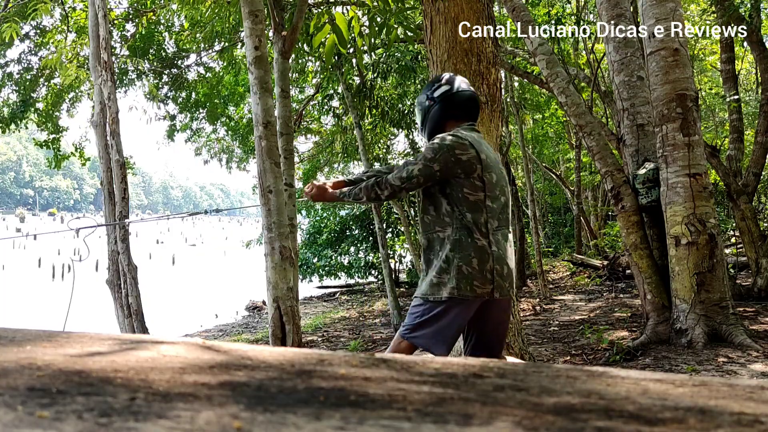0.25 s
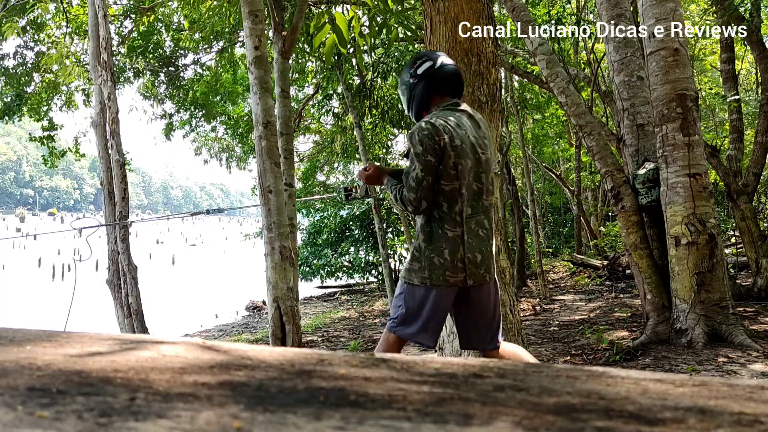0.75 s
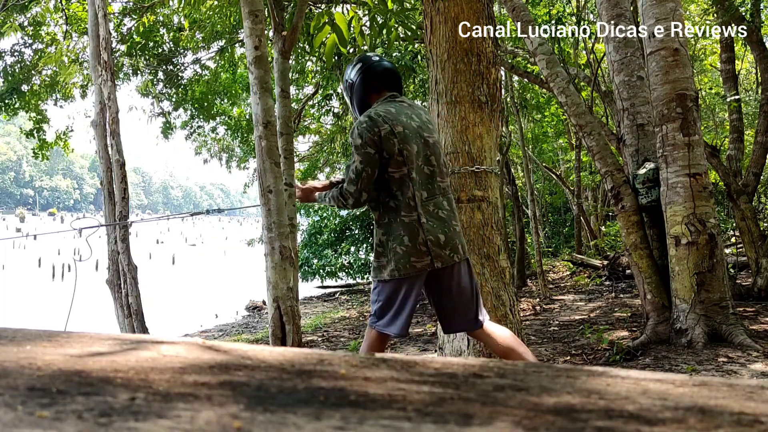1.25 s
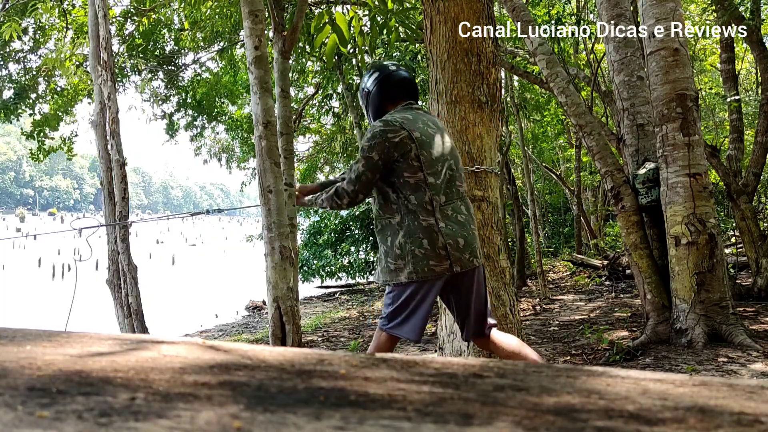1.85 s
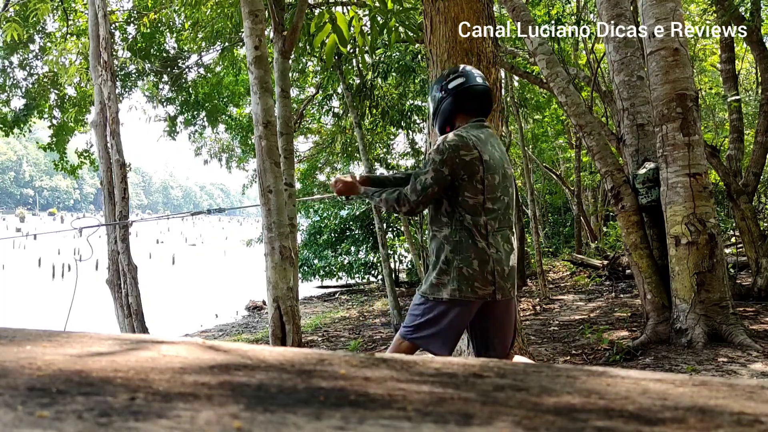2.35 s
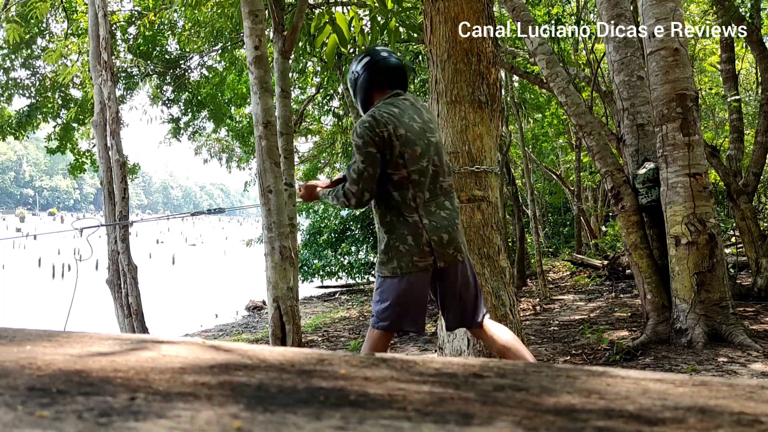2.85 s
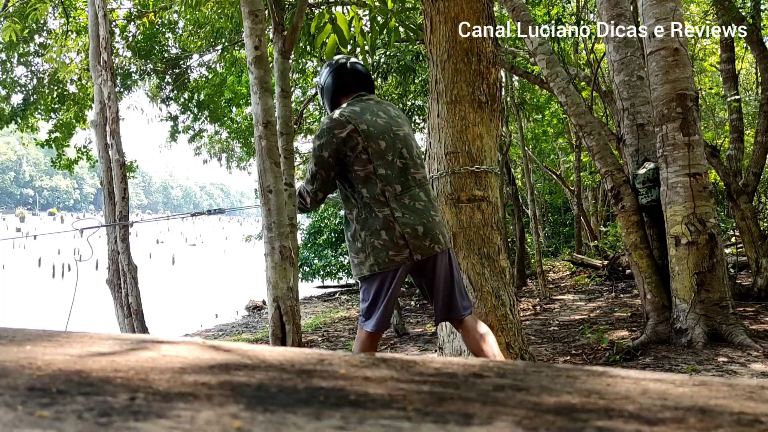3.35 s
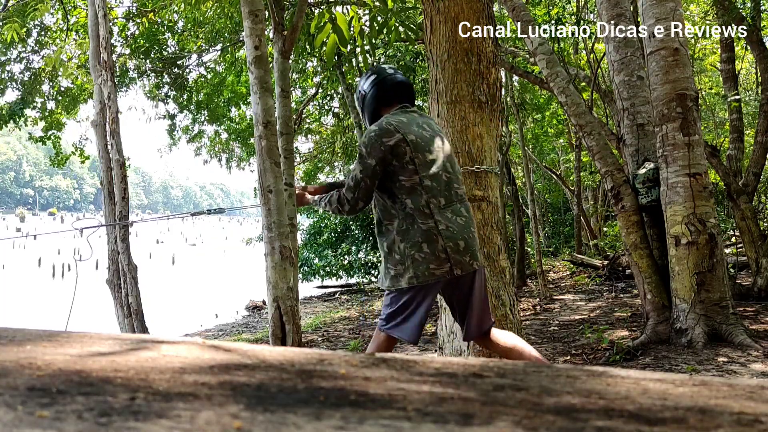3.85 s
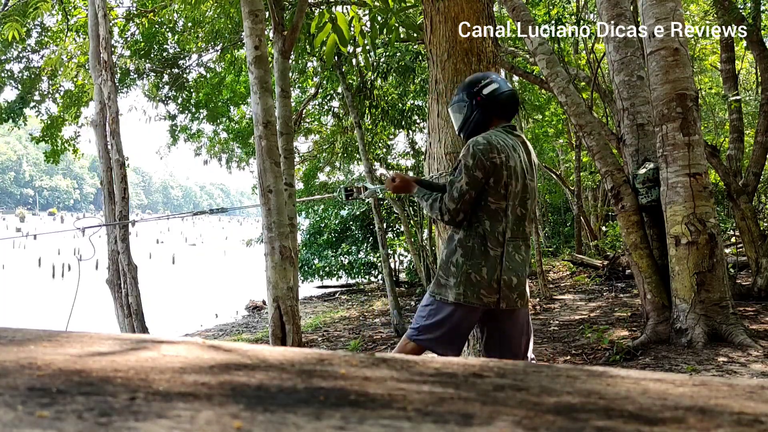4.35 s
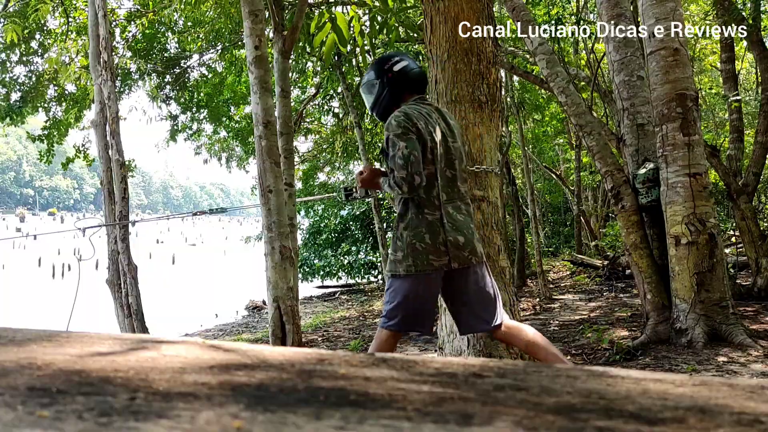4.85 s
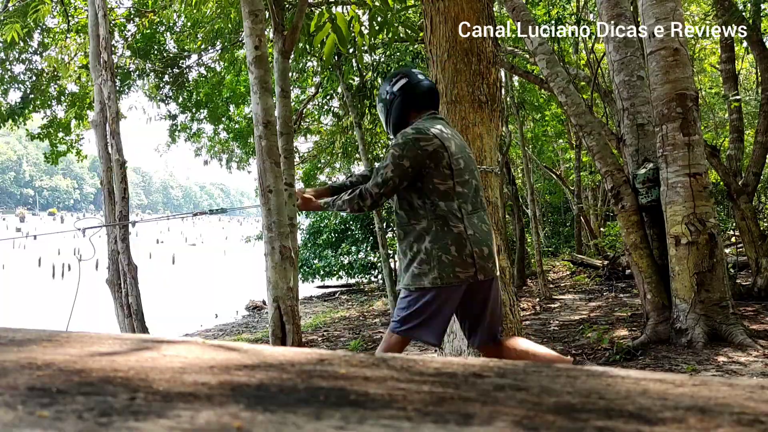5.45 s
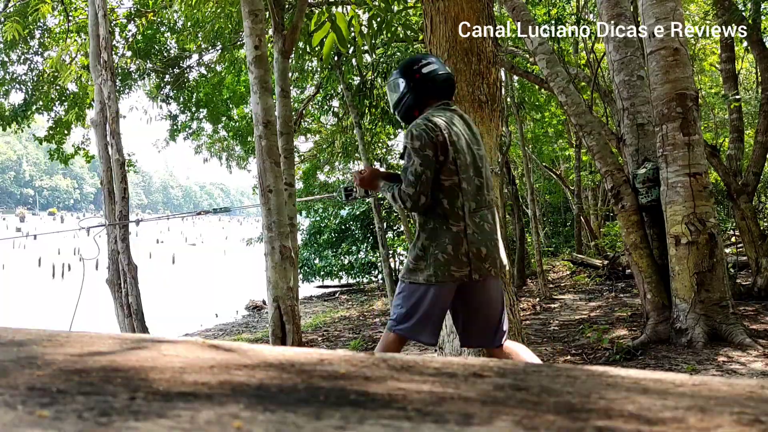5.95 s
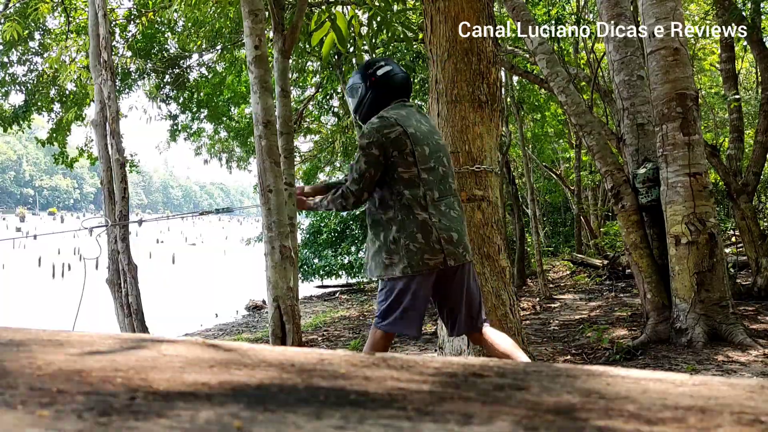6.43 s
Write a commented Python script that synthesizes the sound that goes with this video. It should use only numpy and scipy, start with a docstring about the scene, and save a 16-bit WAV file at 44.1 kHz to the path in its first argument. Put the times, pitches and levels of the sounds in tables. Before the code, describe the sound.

Outdoors among trees, a hand lever winch is pumped under heavy load, heard fairly close in stereo over quiet leaf hiss and low wind rumble. After a small click at 0.3 s, sharp steel snaps fall at 0.53, 0.66 and 0.87, then 1.23 and 1.49, each a dry crack with short metallic ring and brief bright echo. Weaker ticks follow until a double snap at 2.5, then 2.83 and 3.04. It is mostly quiet until about 4.2, with faint ticks and knocks. The loudest cracks come at 4.35 and 4.46, with others at 4.85 and 5.28, where sound cuts out for an instant and fades back. Smaller rattles crowd 5.3 to 6.1, with a dull thud at 5.57. A strong snap and heavier thud hit at 6.25, more clicks follow to 6.67. Faint creaks run beneath; wind bumps swell near 5.46, 5.8 and the end.

```python
"""Steel snaps are heard first: a hand lever winch is pumped under load among trees.
Each pawl snap is a swarm of tiny contacts that rings pawl and lever; wheel modes and echoes linger after it.
Below, shaken frame modes thud, and uneven jerks of cable and frame sound groaning resonances.
Behind lie the hiss of leaves and the rumble of wind on the microphone ports, both shaped from noise.
Once the sound drops out for an instant and fades back."""
import sys
import numpy as np
from scipy import signal
from scipy.fft import rfft, irfft
from scipy.io import wavfile

SR = 44100
rng = np.random.default_rng(int(sys.argv[2]) if len(sys.argv) > 2 else 0)


def dump(signal):
    """Clip the signal to [-1, 1] and save it as 16-bit WAV at the path in sys.argv[1]."""
    limited = np.clip(np.atleast_2d(signal).T, -1, 1)
    pcm = np.round(limited * 32767).astype(np.int16)
    wavfile.write(sys.argv[1], SR, pcm)


N = 295029   # length [samples]


def from_db(db):
    """Decibels to gain."""
    return 10 ** (np.asarray(db) / 20)


def rms_one(x):
    """Scales to rms 1."""
    return x / np.sqrt(np.mean(x ** 2) + 1e-20)


def at_hz(points, hz):
    """Reads a table along a log-frequency axis."""
    table = np.array(points)
    return np.interp(np.log(hz), np.log(table[:, 0]), table[:, 1])


def bins():
    """Frequencies of the transform [Hz], kept above zero for the logarithm."""
    return np.maximum(np.fft.rfftfreq(N, 1 / SR), 1)


def colour(x, spectrum):
    """Shapes by a spectrum, keeping the level of white noise."""
    return irfft(rfft(x) * rms_one(from_db(at_hz(spectrum, bins()))), N)


def drift(rate_hz):
    """Random wander of rms 1: noise through two equal low-pass poles, made at every 40th sample."""
    pole = np.exp(-2 * np.pi * rate_hz * 40 / SR)
    noise = rng.standard_normal(N // 40 + 2002)
    slow = signal.lfilter([1], [1, -2 * pole, pole * pole], noise)[2000:]   # skip the run-in
    return np.interp(np.arange(N) / 40, np.arange(len(slow)), rms_one(slow))


def ring(x, hz, t60):
    """Two-pole resonator: a unit click sets a dying sine of starting height 1 ringing."""
    r = from_db(-60 / (t60 * SR))
    w = 2 * np.pi * hz / SR
    return signal.lfilter([0, np.sin(w)], [1, -2 * r * np.cos(w), r * r], x + 1e-18)


def two_ports(pair, alike):
    """Two unrelated signals become left and right; alike is their likeness at each frequency."""
    mid, side = rfft(pair)
    alike = np.clip(alike, -1, 1)
    left_right = np.sqrt(1 + alike) * mid + np.sqrt(1 - alike) * side * [[1], [-1]]
    return irfft(left_right, N) / np.sqrt(2)


def stereo_noise(alike):
    """White noise for both ports."""
    return two_ports(rng.standard_normal((2, N)), alike)


def registers(x):
    """Splits a sound into low, middle, high and top range, rms 1 each."""
    edges_hz = [(400, 2500), (2500, 8400), (8400, 10500), (10500, 16000)]
    filters = [signal.butter(3, edges, "band", fs=SR, output="sos") for edges in edges_hz]
    return np.array([rms_one(signal.sosfilt(sos, x)) for sos in filters])


# pawl and lever contacts: (time [s], middle-range level [dB], lows over middle [dB], highs over middle [dB],
# rattle length [s], tail over rattle [dB]); levels before the impact boost
SNAPS = [(0.309, -36.5, -7, -24, 0.0073, -20), (0.524, -35, -4, -20, 0.0041, -21),
         (0.5285, -21.5, -10, -7, 0.0085, -11.5), (0.655, -33, -21, -18, 0.0047, -35),
         (0.661, -22, -8.5, -19.5, 0.0077, -11), (0.738, -47.5, 6.5, -18, 0.0088, -20),
         (0.8745, -20.5, -13, 0, 0.0054, -15.5), (1.055, -43, -6.5, -24, 0.017, -10),
         (1.159, -45.5, -9.5, -30, .0089, -6), (1.229, -24, -9.5, 2, 0.0069, -9),
         (1.486, -30, -8.5, 3, 0.013, -8), (1.648, -62, -6, -6, 0.017, 11),
         (1.85, -49.5, -1.5, -15, 0.017, -1), (1.935, -50, 7.5, -12, 0.02, -3),
         (2.253, -32, -9, -19, 0.0055, -23), (2.4165, -53, -2, 6, .0034, -35),
         (2.496, -28, -22, -3.5, 0.0085, -5), (2.502, -24.5, -7, -11, 0.028, -5.5),
         (2.568, -43, -4, 3, 0.003, -48), (2.803, -38.5, 1.5, -12, 0.024, -27),
         (2.831, -23.5, -5.5, 0.5, 0.0044, -12.5), (2.925, -48.5, -1, -8, 0.011, -1.5),
         (3.038, -30.5, -10.5, -0.5, 0.02, -4.5), (3.687, -43.5, -4, -9.5, 0.025, -1),
         (3.941, -50.5, 3.5, -26, 0.0067, -33), (4.167, -47, -1.5, -10, 0.011, -14),
         (4.24, -61, -8, -4, 0.0063, 4.5), (4.29, -56, 3, -10, 0.027, -3),
         (4.348, -17, -10, -4, 0.0029, -28), (4.361, -28, -14, -6, 0.0054, -6),
         (4.394, -33, 5.5, -39, 0.0053, -18.5), (4.451, -40, -1, -23, 0.0046, -17),
         (4.456, -18, -15, -5, 0.005, -15.5), (4.471, -26.5, -11.5, -13, 0.01, -24),
         (4.655, -36.5, -3.5, -27, 0.012, -16), (4.854, -26.5, -12, -0.5, .0041, -13.5),
         (5.076, -38, -14.5, -13, 0.012, -8), (5.28, -21, -8.5, 0.5, 0.0039, -17.5),
         (5.337, -40.5, -4, 4.5, 0.016, -25), (5.421, -69, 6.5, -7, .015, 14.5),
         (5.441, -33, -8.5, -14, 0.013, -22), (5.53, -38.5, -2.5, -33, 0.0073, -11),
         (5.572, -35.5, -5, -9, 0.03, -7), (5.64, -39.5, -2, -14, 0.0081, -11),
         (5.702, -45.5, -8, 5, 0.041, -25), (5.7245, -33.5, -5.5, -2, .014, -19),
         (5.821, -50, -0.5, -3.5, .01, -8), (5.922, -33.5, -8.5, -11, 0.027, -9.5),
         (6.005, -61, 4.5, 0, .015, -9), (6.056, -52.5, -15, 2.5, 0.042, -7),
         (6.08, -44, -5.5, 4, 0.017, -19), (6.2485, -19.5, -9.5, -8, 0.022, -24),
         (6.292, -43.5, -6, 4, 0.017, -15), (6.326, -37.5, -6, -16, 0.0052, -32),
         (6.366, -25, -6, -1.5, .01, -24), (6.41, -53, 6.5, 7, 0.0072, -25),
         (6.495, -55.5, -3, -14, 0.014, -5), (6.571, -39, -9, 0, 0.032, -9),
         (6.674, -30.5, -8, -18, 0.0093, -5)]
# dying time of the echoes in the low, middle, high and top range [s]
TAIL_T60_S = [0.25, 0.36, 0.42, 0.32]
SNAP_RISE_S, TAIL_RISE_S = 0.00049, 0.0024
RATTLE_SAG_DB, SETTLE_T60_S = 3.5, 0.083   # sag over the rattle length, then extra decay
IMPACT_BOOST, IMPACT_FADE_S = 0.55, 0.00055   # the first contacts of a snap are the hardest
# high range over top range [dB], more after bright and after lingering snaps [dB per dB]
WHEEL_LEAD_DB, LEAD_PER_HIGH, LEAD_PER_TAIL = 1, 0.61, 0.22
STRENGTH_SPREAD_DB = 4.9   # how far each pawl mode varies from snap to snap
WHEEL_SPREAD = 0.5   # the wheel's modes vary by this share of it


def snap_envelopes():
    """Each snap sets a rattle and a tail gain in four ranges, and how strongly it strikes every mode."""
    rattle, tail = np.zeros((4, 1, N)), np.zeros((4, 1, N))
    struck_db = np.zeros((len(STEEL) + len(WHEEL), N))
    strength_db = rng.normal(0, STRENGTH_SPREAD_DB, (len(SNAPS), len(struck_db), 1))
    strength_db[:, len(STEEL):] *= WHEEL_SPREAD
    half_second = np.arange(SR // 2) / SR
    for own_db, (s, level_db, low_db, high_db, length, tail_db) in zip(strength_db, SNAPS):
        at = round(s * SR)
        u = half_second[:N - at]
        span = slice(at, at + len(u))
        lead_db = WHEEL_LEAD_DB + LEAD_PER_HIGH * high_db + LEAD_PER_TAIL * tail_db
        lead_db = np.clip(lead_db, -13, 3.0)
        ranges_db = np.array([low_db, 0, high_db + lead_db / 2, high_db - lead_db / 2])
        gains = from_db(level_db + ranges_db)[:, None]
        # the rattle builds within a moment, sags, then settles
        sag_db = RATTLE_SAG_DB * u / length
        settle_db = 60 * np.maximum(u - length, 0) / SETTLE_T60_S
        shape = (1 - np.exp(-u / SNAP_RISE_S)) * from_db(-sag_db - settle_db)
        impact = 1 + IMPACT_BOOST * np.exp(-u / IMPACT_FADE_S)
        rattle[:, 0, span] += gains * shape * impact
        dying = from_db(tail_db - 60 * u / np.array(TAIL_T60_S)[:, None])
        tail[:, 0, span] += gains * dying * (1 - np.exp(-u / TAIL_RISE_S))
        # the newest snap takes over the modes; bright ones ring the wheel most
        struck_db[:, span] = own_db
        struck_db[len(STEEL):, span] += 1.3 * lead_db
    return rattle, tail, struck_db[:len(STEEL)], struck_db[len(STEEL):]


# colour of the tiny contacts before the ranges are levelled: (frequency [Hz], relative density [dB per Hz])
RATTLE_SPECTRUM = [(500, -31.5), (900, -33.5), (1300, -14.5), (2400, -12), (4000, 4), (8000, -2),
                   (12000, 8.5), (15000, 9)]
CONTACTS_PER_S = 12000


def crack(rattle, alike):
    """Tooth and pawl meet in random tiny contacts of drifting strength, coloured and swelled by the snaps."""
    hits = (rng.random(N) < CONTACTS_PER_S / SR) * from_db(1.2 * drift(110))
    contacts = two_ports(hits * rng.standard_normal((2, N)), alike)
    return np.sum(rattle * registers(colour(contacts, RATTLE_SPECTRUM)), axis=0)


# pawl and lever modes: (frequency [Hz], relative level [dB], t60 [s])
STEEL = [(1306, 4.5, 0.037), (1480, -58, 0.0053), (1940, 4, 0.027), (2172, -9.5, 0.087), (2574, -2, 0.0066),
         (3136, -10.5, 0.12), (3772, -8.5, 0.042), (4430, -19, 0.042), (5455, -1.5, 0.039),
         (6750, -4, 0.049), (6850, -46, 0.016)]
RING_DB = -38   # trim of all these modes together


def steel_ring(cracks, struck_db):
    """The contacts drive the resonances of pawl and lever, each struck a little differently per snap."""
    modes = sum(from_db(level_db) * ring(cracks * from_db(own_db), hz, t60)
                for own_db, (hz, level_db, t60) in zip(struck_db, STEEL))
    return from_db(RING_DB) * modes


# colour of the echoes from the trunks: (frequency [Hz], relative density [dB per Hz])
ECHO_SPECTRUM = [(400, -4), (680, -0.5), (950, -5.5), (1300, 4), (2400, 2), (5000, 9.5), (9000, 7.5),
                 (15000, 41)]
# modes of the toothed wheel: (frequency [Hz], relative level [dB])
WHEEL = [(3450, -3), (4840, -3), (5980, 0), (7000, -2), (7750, 5), (8090, 2), (8810, 2), (8915, 0),
         (9240, 0), (9365, 3), (9480, 5), (9605, 6), (9700, 7), (9880, 5), (10100, 1), (11200, -3)]
WHEEL_T60_S, WHEEL_DB = 0.075, -35   # ring time, and trim against the hiss
ECHO_ALIKE = 0.36   # share of the winch's left-right likeness left in the echoes


def wheel_and_echoes(tail, struck_db, alike):
    """Loose parts go on shaking the wheel: noise keeps its modes wavering inside the hiss of echoes."""
    hiss = colour(stereo_noise(ECHO_ALIKE * alike), ECHO_SPECTRUM)
    wheel = sum(from_db(WHEEL_DB + level_db + own_db) * ring(hiss, hz, WHEEL_T60_S)
                for own_db, (hz, level_db) in zip(struck_db, WHEEL))
    grain = from_db(2.2 * drift(60))   # grainy bounces
    return np.sum(tail * registers(hiss + wheel), axis=0) * grain


# stereo image of the winch: (frequency [Hz], left-right likeness [-1 to 1])
WINCH_ALIKE = [(100, 0.96), (3700, 0.96), (4700, 0.51), (7000, 0.45), (8800, 0.037), (14000, 0.078)]


def ratchet():
    """The pawl snaps over the teeth: contacts crack, steel rings, wheel and echoes linger."""
    rattle, tail, pawl_db, wheel_db = snap_envelopes()
    alike = at_hz(WINCH_ALIKE, bins())
    cracks = crack(rattle, alike)
    return cracks + steel_ring(cracks, pawl_db) + wheel_and_echoes(tail, wheel_db, alike)


# knocks through frame, cable and trunk: (time [s], relative push [dB], second mode over it [dB],
# upper modes over it [dB], shake length [s])
THUDS = [(0.501, -67, 9, 1, 0.022), (0.746, -44.5, -5, -15, 0.021), (0.872, -57.5, -8, 3, .028),
         (1.231, -63.5, 6, 16.5, 0.054), (1.488, -52.5, -6, 7, 0.029), (1.599, -52, -19, -18, 0.053),
         (2.508, -47, 8.5, 3, .044), (2.811, -50, 1, -10, 0.037), (3.036, -45, -21, 5, 0.022),
         (3.575, -58, -10, -2.5, 0.12), (3.708, -44.5, -22, -19, 0.025), (4.277, -62.5, -19, 8, 0.042),
         (4.395, -59.5, 5, 13.5, .038), (4.659, -54.5, 5.5, -1, 0.022), (5.572, -32, -20.5, -12, 0.02),
         (5.719, -54, 0, 9.5, 0.016), (5.932, -60.5, 5.5, 14.5, 0.034), (6.248, -23, -9.5, -13.5, .016),
         (6.365, -54, -8, 6.5, 0.029)]
# frame modes: (frequency [Hz], relative level [dB], t60 [s])
FRAME = [(151.6, 5.5, 0.042), (263.5, 3, 0.11), (384.5, 3.5, 0.028), (665, 6.5, 0.045), (780, -17, 0.26)]
SHAKE_RISE_S, FRAME_DB = 0.00084, -26   # onset of a shake, trim of all thuds


def thuds():
    """A lumpy shake drives the low modes of the frame, each group with its own strength."""
    push, u = np.zeros((3, N)), np.arange(SR // 6) / SR
    lumps = rng.standard_normal((len(THUDS), len(u)))
    for lump, (s, level_db, second_db, upper_db, length) in zip(lumps, THUDS):
        shake = lump * (1 - np.exp(-u / SHAKE_RISE_S)) * np.exp(-u / length)
        groups_db = level_db + np.array([[0], [second_db], [upper_db]])
        push[:, round(s * SR):][:, :len(u)] += from_db(groups_db) * shake
    # group 0 lies below 200 Hz, group 1 up to 500 Hz, group 2 above
    rings = sum(from_db(level_db) * ring(push[int(hz > 200) + int(hz > 500)], hz, t60)
                for hz, level_db, t60 in FRAME)
    return from_db(FRAME_DB) * signal.sosfilt(signal.butter(4, 105, "high", fs=SR, output="sos"), rings)


# creaks, and a short low ring under the snap near 4.85 s:
# (start [s], length [s], relative groan level [dB], relative upper ring level [dB])
GROAN_STRETCHES = [(0.245, 0.061, -68.5, -59), (0.466, 0.2, -62.5, -59), (1.204, 0.032, -70, -52),
                   (1.824, 0.19, -71.5, -59.5), (2.518, 0.097, -52.5, -54), (2.675, 0.24, -73, -63),
                   (3.067, 0.23, -75, -80), (3.265, 0.037, -65, -58), (3.551, 0.071, -77, -59.5),
                   (4.138, 0.33, -65.5, -69), (4.622, 0.044, -60, -58), (5, 0.037, -52.5, -59),
                   (5.517, 0.25, -71, -83), (4.847, 0.038, -58.5, -60), (6.183, 0.033, -72, -59),
                   (6.554, 0.056, -57, -48)]
# cable and frame resonances: (frequency [Hz], width [Hz], relative level [dB])
GROAN = [(466, 13, -7.5), (641, 9, -4), (735, 21, 2), (900, 95, -5), (1269, 23, 0), (1820, 180, -1)]
SLIPS_PER_S, IDLE_DB = 380, -79   # base rate before clumping, relative level between the stretches


def groan():
    """Cable and frame slip in uneven, clumped jerks that sound their resonances."""
    t = np.arange(N) / SR
    effort = np.full((2, N), from_db(IDLE_DB))   # groan, upper ring
    for s, length, low_db, upper_db in GROAN_STRETCHES:
        ramp = np.clip(np.minimum(t - s, s + length - t) / 0.021, 0, 1)
        effort += from_db([[low_db], [upper_db]]) * ramp
    slips = rng.random(N) < SLIPS_PER_S * from_db(3.0 * drift(14)) / SR
    jerks = slips * rng.standard_normal(N)
    voices = np.zeros(N)
    for hz, width, level_db in GROAN:
        t60 = np.log(1000) / (np.pi * width)   # a wide resonance dies fast
        voices += from_db(level_db) * effort[int(hz > 1000)] * rms_one(ring(jerks, hz, t60))
    return voices


# colour of the leaves: (frequency [Hz], relative density [dB per Hz])
LEAVES_SPECTRUM = [(55, 15), (90, 2.5), (140, 11.5), (200, 6.5), (260, 7), (400, 2), (700, 2), (1100, -3.5),
                   (1800, 1), (4000, 0.5), (7000, -2), (14000, -4)]
# stereo image of the leaves: (frequency [Hz], left-right likeness [-1 to 1])
LEAVES_ALIKE = [(60, 0), (150, 0.79), (600, 0.42), (1400, 0), (14000, 0.029)]
LEAVES_DB = -53.5   # level around which they drift


def leaves():
    """Leaves hiss as coloured noise that swells with slow gusts and quick rustle."""
    hiss = colour(stereo_noise(at_hz(LEAVES_ALIKE, bins())), LEAVES_SPECTRUM)
    return hiss * from_db(LEAVES_DB + 0.5 * drift(0.12) + 0.45 * drift(9.8))


# colour of the wind: (frequency [Hz], relative density [dB per Hz])
WIND_SPECTRUM = [(10, 7.5), (22, -6), (31, -8.5), (46, -2), (85, -18), (130, -14.5), (250, -60)]
# wind strength: (time [s], level [dB])
GUSTS = [(0.0, -53), (1.2, -52.5), (3.33, -54), (3.54, -49.5), (3.61, -52), (4.15, -53.5), (4.6, -49),
         (5.23, -52.5), (5.46, -44.5), (5.68, -53), (5.8, -46.5), (6.09, -51.5), (6.69, -44.5)]


def wind():
    """Wind rumbles on the ports: low noise, little alike left and right, that follows the gusts."""
    level_db = np.interp(np.arange(N) / SR, *np.transpose(GUSTS))
    return colour(stereo_noise(0.23), WIND_SPECTRUM) * from_db(level_db)


def scene():
    """Winch, leaves and wind as they reach the ports."""
    background = leaves() + wind()
    return ratchet() + thuds() + groan() + background


# treble response of left and right sides, with its steep roll-off near 14.5 kHz:
# (frequency [Hz], left gain [dB], right gain [dB])
TREBLE_RESPONSE = [(3730, 0.5, 0), (6280, -2, -0.5), (8630, -2, 5), (8560, 5.5, 8), (9600, -2, 8.5),
                   (10490, 2, -9), (11340, 6, -4), (12370, 5, -21), (12560, -6.5, -12),
                   (13400, -3.5, -14.5), (14310, -9, -13), (14700, -40, -47)]


def treble_response(x):
    """Left and right colour the treble differently, with peaks and dips before a steep roll-off."""
    hz, *sides_db = np.transpose(TREBLE_RESPONSE)
    gains_db = [np.interp(bins(), hz, side_db) for side_db in sides_db]
    return irfft(rfft(x) * from_db(gains_db), N)


BREAK_S, BREAK_FADE_S = 5.2862, 0.0016   # the sound breaks off once
RETURN_S, RETURN_RISE_S = 5.3035, 0.011
CUTOFF_HZ = 15633   # from here up the treble is at least 50 dB down


def record(dry):
    """The treble is coloured on each side; the sound breaks off once and fades back; the top is cut."""
    t = np.arange(N) / SR
    leaving = 1 - (t - BREAK_S) / BREAK_FADE_S
    returning = (t - RETURN_S) / RETURN_RISE_S
    passing = np.clip(np.maximum(leaving, returning), 0, 1)
    top_cut = signal.cheby2(14, 50, CUTOFF_HZ, fs=SR, output="sos")
    return signal.sosfilt(top_cut, treble_response(dry) * passing ** 2)


dry = scene()
out = record(dry)
dump(out)
```